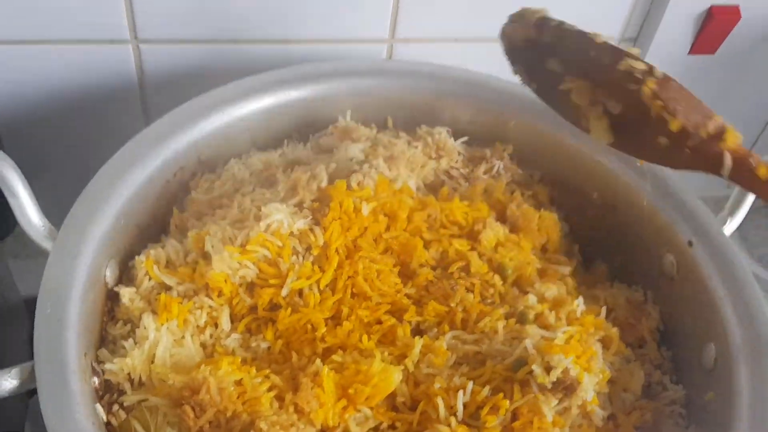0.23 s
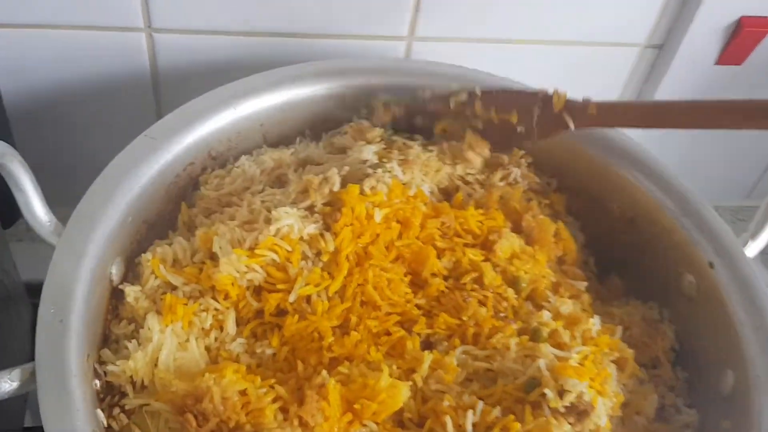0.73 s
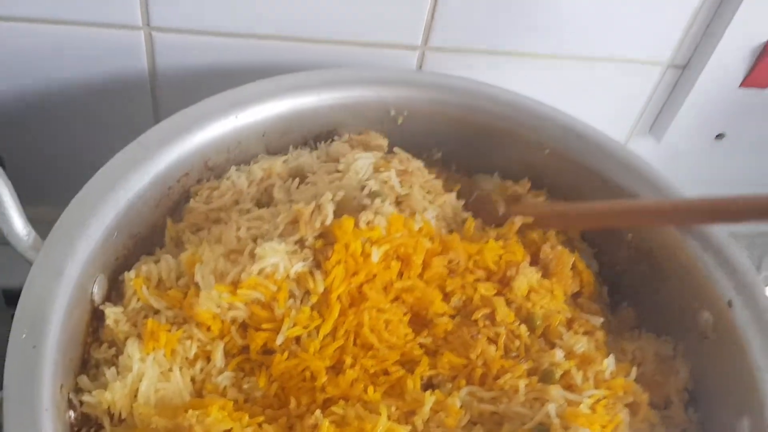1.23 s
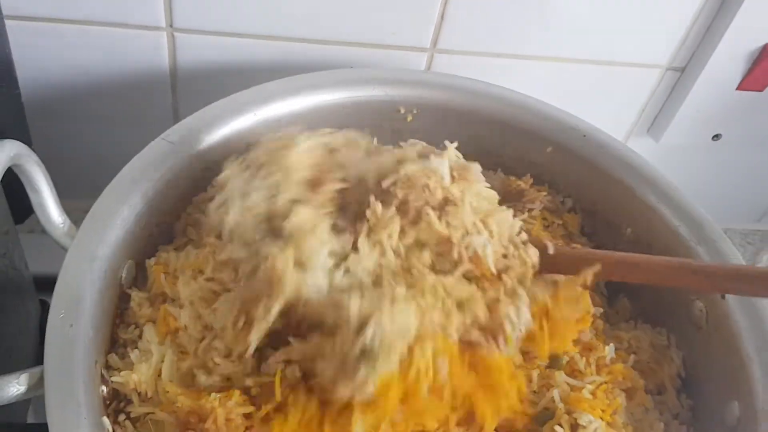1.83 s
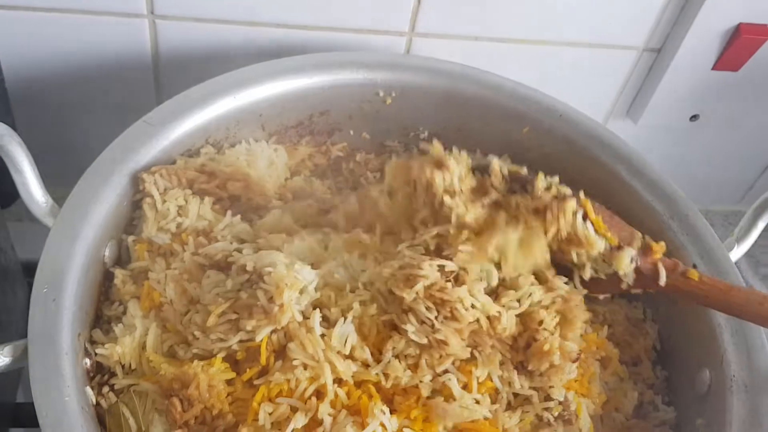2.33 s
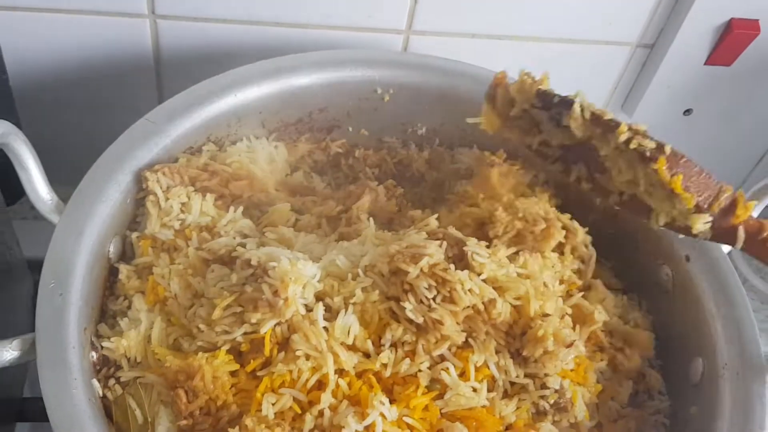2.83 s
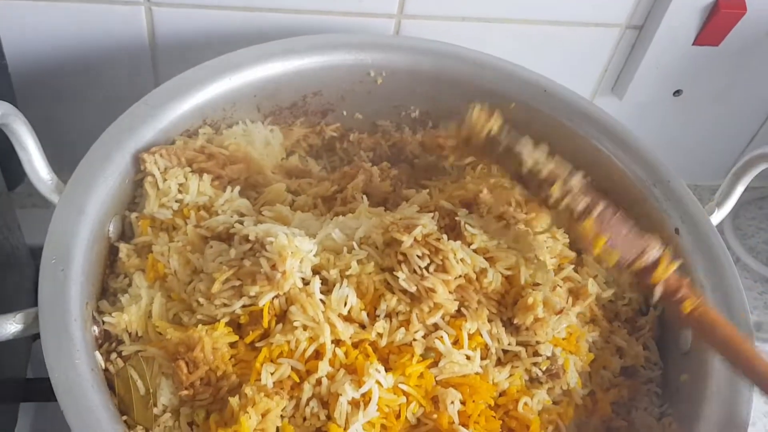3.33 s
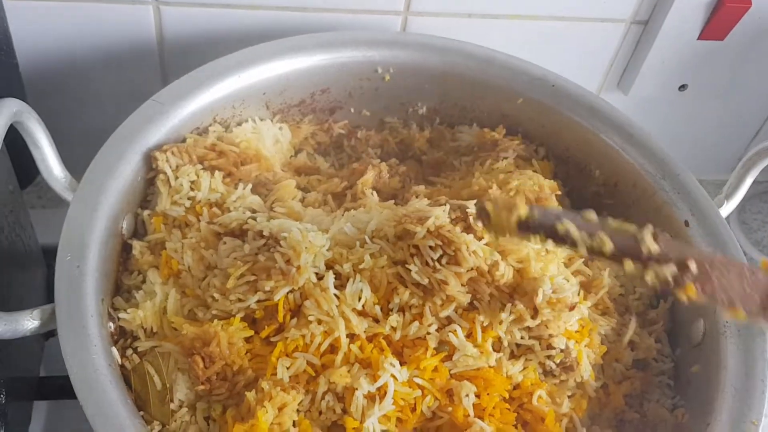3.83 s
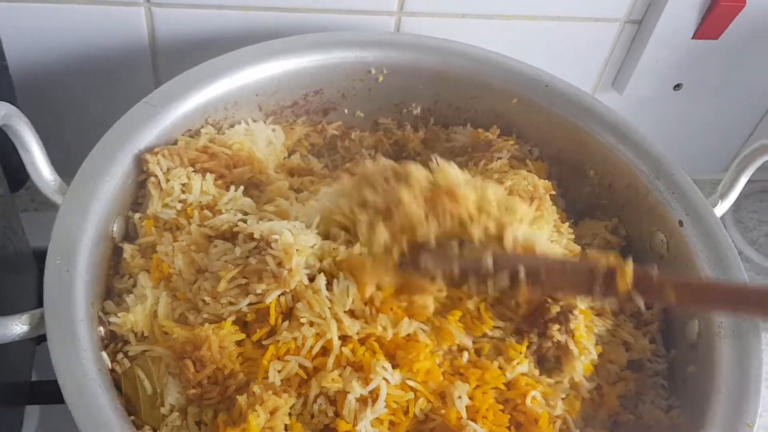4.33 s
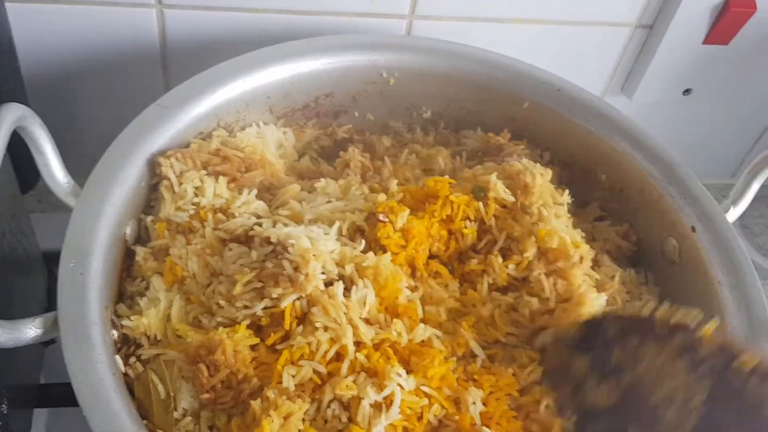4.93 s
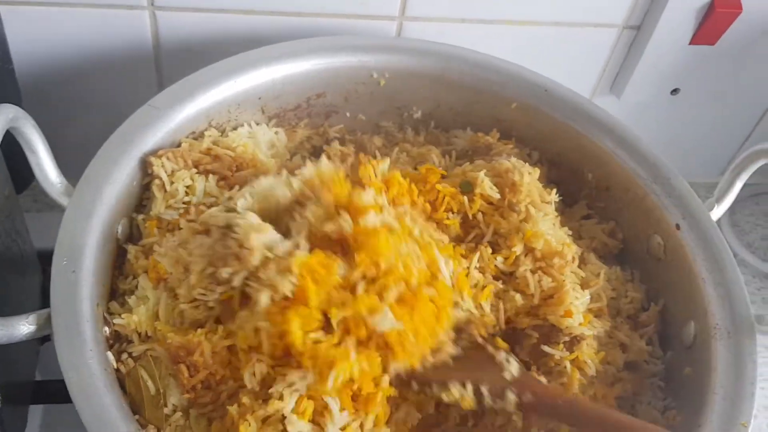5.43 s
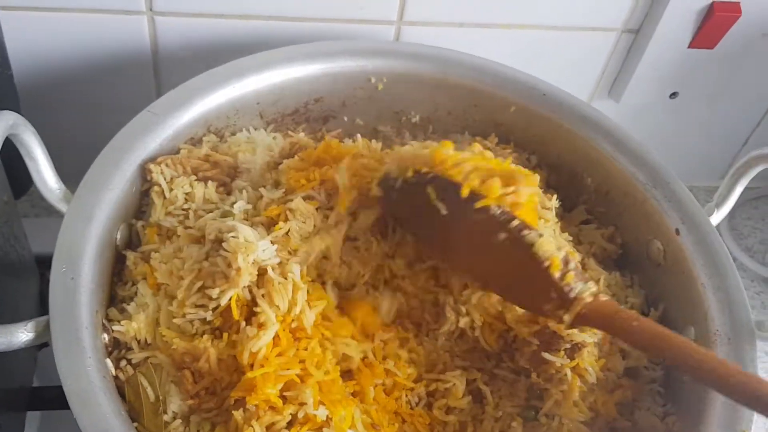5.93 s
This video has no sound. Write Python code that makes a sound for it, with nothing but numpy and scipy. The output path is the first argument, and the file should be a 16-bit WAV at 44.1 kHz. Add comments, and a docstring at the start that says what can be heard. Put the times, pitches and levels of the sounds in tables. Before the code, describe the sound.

A wooden spoon gives a sharp, damped knock on a big aluminium pot of cooked rice, then scrapes down the wall with a cluster of smaller knocks. Moist grains crackle softly as they are turned, and a few clumps drop. Two more knocks come midway and two duller ones near the end. The sound is close, in a small tiled kitchen with quiet room noise and a faint appliance whine.

```python
"""A wooden spoon turns cooked rice in a big aluminium pot on a stove, close by in a small tiled kitchen.
Its knocks ring the pot's damped modes and shake the stove top. It scrapes down the wall in
stick-slip and rubs the metal under the rice. Moist grains crackle as they part and whisper along
the wall; a few clumps drop. The tiles add a short tail over quiet room noise and an appliance whine."""
import sys
import numpy as np
from scipy import signal
from scipy.fft import rfft, irfft, next_fast_len
from scipy.io import wavfile

SR = 44100
rng = np.random.default_rng(int(sys.argv[2]) if len(sys.argv) > 2 else 0)


def pcm_store(signal):
    """Save signal as 16-bit PCM."""
    levels = np.round(np.clip(np.atleast_2d(signal), -1, 1) * 32767)
    wavfile.write(sys.argv[1], SR, levels.astype(np.int16).T)


N = 273081
T = np.arange(N) / SR
RING = T[:SR * 7 // 10]  # time axis of one event, s

# pot modes, damped by the rice: pitch_hz, level_db, t60_s
POT_MODES = [(290, -25, .13), (385, -25, .11), (440, -23, .13), (500, -20, .13), (575, -20, .13),
             (668, -16, .11), (791, -15, .14), (840, -10, .15), (960, -6, .055), (1100, -16, .09),
             (1340, -16, .12), (1590, -23, .07), (1766, -21, .12), (1857, -22, .12), (2159, -19, .1),
             (2400, -17, .06), (2800, -21, .12), (2929, -21, .12), (3580, -20, .07), (4000, -20, .09),
             (4310, -21, .09), (4970, -16, .07), (5730, -19, .07), (6360, -17, .06), (6900, -24, .07),
             (7570, -23, .06)]
# stove top modes: pitch_hz, level_db, t60_s
STOVE_MODES = [(76.25, -16, 0.44), (94.8, -3.5, 0.11), (129.1, -11.5, 0.27)]


def knocks(split_hz=750, belly_rise_s=0.013, stove_lag_s=0.008, contact_cycles=1.08):
    """Spoon on pot: the struck spot sounds first, the heavy belly swells, then the stove takes the blow."""
    # blows: start_s, level_db, hardness_hz, belly_db, thump_db, note_hz, note_db, note_t60_s, belly_hz
    blows = [(0.043, -6.5, 8000, 3.5, -4, 945, 2, 0.046, 253.5),
             (0.8888, -20, 15100, 9, -5, 1244, -8.5, 0.33, 400),
             (0.9955, -21, 6500, -7, -2.5, 1557, -6, 0.064, 303),
             (1.0390, -25, 3170, -2, -2.5, 1010, -5, 0.041, 294),
             (1.0530, -31.5, 1000, -10, -4, 505, 13, 0.18, 309),
             (1.0820, -27.5, 2800, -10, -13, 511, -6, 0.098, 294),
             (1.1814, -25.5, 5700, 13.5, -5, 1350, 1, 0.054, 347),
             (1.1884, -20, 1100, 0, -5, 537, 22.5, .022, 337),
             (2.4817, -34, 1000, 9.5, 4.5, 579, 10, .087, 269),
             (3.3224, -21.5, 5140, 4.5, 4.5, 912, 5, 0.078, 412),
             (3.473, -13.5, 7800, 3.5, 2.5, 917, 0.5, 0.066, 336),
             (4.9800, -22, 740, 6.5, -9.5, 626, 2, 0.13, 261),
             (5.2038, -20.5, 1400, 3, -8.5, 637, -6, 0.15, 257)]
    # spectrum of the dense wall modes: freq_hz, density_db
    crack_curve = [(200, -37), (500, 6), (1000, 3.5), (1500, -1), (3000, -0.5), (5500, -6.5), (8000, -6.5),
                   (11000, -10), (16000, -32)]
    wall_modes = [mode for mode in POT_MODES if mode[0] > split_hz]
    belly_modes = [mode for mode in POT_MODES if mode[0] <= split_hz]
    out = np.zeros((2, N))
    for start_s, db, hardness_hz, belly_db, thump_db, note_hz, note_db, note_t60_s, belly_hz in blows:
        crack = unit(colour(diffuse(len(RING)), crack_curve))
        crack *= undb(-6) * fade(0.038) + undb(-20) * fade(0.1)
        wood = undb(-9) * diffuse(len(RING)) * fade(0.031)
        wall = ring(wall_modes) + crack + wood
        boom = undb(-14) * unit(low(band(diffuse(len(RING)), 390, 337), split_hz)) * fade(0.14)
        belly = (ring(belly_modes) + boom) * undb(belly_db) + ring([(belly_hz, -7.5, 0.13)])
        note = undb(note_db) * fade(note_t60_s) * np.sin(2 * np.pi * note_hz * RING)  # struck spot
        if note_hz < split_hz:
            note *= swell(belly_rise_s)
        # rice cushions the contact: less treble, slower start
        pot = low(wall, hardness_hz) + belly * swell(belly_rise_s) + note
        add(out, start_s, undb(db) * pot * swell(contact_cycles / hardness_hz))
        rumble = undb(-19) * unit(low(band(diffuse(len(RING)), 97.3, 98.4), 190, order=4)) * fade(0.35)
        stove = (ring(STOVE_MODES) + rumble) * swell(0.0043)
        add(out, start_s + stove_lag_s, undb(db + thump_db) * stove)
    return out


def scrape(tilt_db_per_oct=2, judder_db=2.4):
    """Wood sticks and slips on the wall: slips ring the pot and shake the stove, the wood grain hisses."""
    # resonances under the dragged spoon: centre_hz, width_hz, gain_db (before tilt)
    modes = [(498, 91, 2.5), (807, 35, 2.5), (873.6, 27, 1), (1064, 140, -8.5), (1190, 9.4, -6),
             (1765, 37, -10.5), (2174, 80, -12), (2890, 180, -20.5), (3400, 76, -24)]
    # wood grain spectrum: freq_hz, density_db
    rasp_curve = [(500, 2), (1050, -18), (1500, 4), (2200, -3.5), (3700, -7), (5000, -8.5), (9000, -11.5),
                  (13000, -13), (15500, -24)]
    slips = grains(900, 2)
    drive = slips + 0.7 * diffuse(N)
    press = pressure(t60_s=0.58)
    tilt = undb(tilt_db_per_oct)  # the hard edge favours high resonances
    body = sum(undb(db) * tilt ** np.log2(hz / 800) * band(band(drive, hz, width_hz), hz, hz / 2)
               for hz, width_hz, db in modes)
    body /= np.sqrt(np.average(np.mean(body ** 2, axis=0), weights=press ** 2))  # rms 1 in the stroke
    shudder = undb(-9) * unit(sum(undb(db) * band(slips, hz, 33) for hz, db, _ in STOVE_MODES))
    rasp = unit(colour(0.9 * slips + diffuse(N), rasp_curve))
    judder = unit(undb(judder_db * wander(60)))  # the edge grabs and lets go
    return judder * (undb(-31.5) * press * (body + shudder) + undb(-38.5) * pressure(t60_s=0.6) * rasp)


def pressure(t60_s, touch_s=0.833, bite_s=0.889, hold_s=0.18):
    """Force of the scraping edge: light touch, bite, hold, release."""
    touch = undb(-14.5) * stroke(touch_s, bite_s - touch_s, attack_s=0.028, t60_s=t60_s)
    bite = stroke(bite_s, hold_s, attack_s=0.0035, t60_s=t60_s)
    return np.maximum(touch, bite)


def rub(groan_hz=645, width_hz=65):
    """Buried in rice, the spoon draws a muffled groan from the pot."""
    # slips on the metal: start_s, length_s, level_db
    slips = [(0.72, 0.065, -58), (1.23, .03, -58), (1.36, 0.033, -51.5), (1.46, 0.027, -49.5),
             (1.56, 0.13, -59), (1.755, 0.017, -55.5), (1.965, 0.094, -56.5), (5.62, 0.045, -61)]
    drive = grains(700, 2.5) + 0.5 * diffuse(N)
    groan = unit(band(band(drive, groan_hz, width_hz), groan_hz, 4 * width_hz))
    wall = sum(undb(db) * band(drive, hz, 3 / t60_s) for hz, db, t60_s in POT_MODES)
    return strokes(slips, attack_s=0.0067, t60_s=0.22) * (groan + undb(-6) * unit(low(wall, 3600)))


def rice(spots=8, spot_rate_hz=600, spread_db=2.5, resting_db=-63.5, settle_t60_s=5.5):
    """Moist grains crackle as they part and settle; the pot smears each spot differently."""
    # turns of the spoon: start_s, length_s, level_db
    turns = [(0.71, .1, -57.5), (1.25, 1, -60), (2.35, 0.44, -57), (3.52, 0.54, -53.5), (4.5, 0.18, -56),
             (4.95, 0.47, -56.5)]
    # crackle spectrum: freq_hz, density_db
    crackle_curve = [(400, -11.5), (1000, 2.5), (2000, -1), (3000, -5.5), (4500, -5.5), (6500, -8),
                     (9000, -2.5), (12000, -2.5), (14000, -5.5), (15500, -7)]
    smeared = 0
    for _ in range(spots):
        smear = rng.standard_normal((2, len(RING))) * fade(0.003)
        smeared += signal.fftconvolve(grains(spot_rate_hz, spread_db)[None], smear, axes=1)[:, :N]
    clicks = np.array([grains(2 * spot_rate_hz, spread_db) for _ in range(2)])
    crackle = unit(colour(unit(smeared) + 0.45 * clicks, crackle_curve))
    flicker = undb(0.7 * wander(12))
    stirring = np.hypot(undb(resting_db), strokes(turns, attack_s=0.043, t60_s=settle_t60_s))
    return crackle * stirring * flicker


def sweep():
    """Grains sliding on the wall whisper in its high modes."""
    # pushes of rice along the metal: start_s, length_s, level_db
    pushes = [(1.34, 0.046, -48), (5.22, 0.12, -54), (5.43, 0.21, -60.5)]
    # high wall modes: centre_hz, width_hz, gain_db
    modes = [(2160, 370, 0), (4090, 160, 4.5), (4430, 64, 4), (4920, 110, 4), (5580, 69, -1),
             (6400, 110, -16), (7900, 320, -1)]
    drive = grains(2500, 3) + diffuse(N)
    wall = unit(sum(undb(db) * band(drive, hz, width_hz) for hz, width_hz, db in modes))
    hiss = 0.55 * unit(band(diffuse(N), 5000, 6000))
    return strokes(pushes, attack_s=0.021, t60_s=0.45) * unit(wall + hiss)


def grain_snaps():
    """Single sticky grains snap with a high tick."""
    # snaps: start_s, peak_db, centre_hz
    snaps = [(1.752, -42, 6340), (1.797, -41, 9100), (1.8944, -40, 10000), (1.9797, -40, 7000),
             (2.1633, -35.5, 9500), (2.1932, -39, 8350), (2.218, -41, 8520), (2.665, -41, 11850),
             (2.948, -32, 7200), (5.6124, -37.5, 10970)]
    return bursts(snaps, t60_s=0.013, width_ratio=0.3)


def clump_drops():
    """Soft clumps fall off the spoon and land without ringing."""
    # landings: start_s, peak_db, centre_hz
    clumps = [(2.177, -46, 1300), (2.238, -37.5, 616), (2.2765, -30.5, 1160), (2.349, -39, 124)]
    return bursts(clumps, t60_s=0.018, width_ratio=1.6)


def tiles(x, wet_db=-9, t60_s=0.26, gap_s=0.0026):
    """Direct sound plus a short bright tail off the tiled walls."""
    response = diffuse(len(RING)) * fade(t60_s) * (RING > gap_s)
    response /= np.sqrt(np.sum(response ** 2) / 2)
    bright = x - low(x, 298, order=1)
    return x + undb(wet_db) * signal.fftconvolve(bright, response, axes=1)[:, :N]


def kitchen(air_db=-54, whine_hz=2396, whine_db=-67):
    """Room rumble and hiss with a thin, slightly unsteady appliance whine."""
    # room noise spectrum: freq_hz, density_db
    air_curve = [(20, -25), (50, 2), (80, -4.5), (135, -3.5), (215, -22.5), (330, -23), (450, -28),
                 (600, -19), (950, -16.5), (1500, -16), (2400, -24), (3200, -27.5), (11000, -29.5),
                 (15500, -36.5)]
    waver_db = 0.35 * wander(5)
    air = unit(colour(diffuse(N), air_curve)) * undb(air_db + waver_db)
    pitch_hz = whine_hz + 10 * wander(30)
    return air + undb(whine_db) * np.sin(2 * np.pi * np.cumsum(pitch_hz) / SR)


def ring(modes, apart_hz=1800):
    """Decaying modes, weighted anew per blow; high ones reach the two sides out of phase."""
    out = 0
    for hz, db, t60_s in modes:
        jitter_db, skew, polarity = rng.standard_normal(3)
        phase = np.pi * (polarity > 0) + np.array([[1], [-1]]) * skew * min(hz / apart_hz, 1)
        out += undb(db + jitter_db) * fade(t60_s) * np.sin(2 * np.pi * hz * RING + phase)
    return out


def bursts(rows, t60_s, width_ratio):
    """Short dead noise bursts, each around its own pitch."""
    out = np.zeros((2, N))
    for start_s, db, hz in rows:
        burst = band(diffuse(len(RING)) * fade(t60_s), hz, width_ratio * hz)
        burst = low(burst, 1.15 * hz, order=4)
        add(out, start_s, undb(db) * burst / np.abs(burst).max())
    return out


def grains(rate_hz, spread_db):
    """Random impulses, a few much stronger than the rest."""
    hit = rng.random(N) < rate_hz / SR
    return unit(hit * rng.standard_normal(N) * undb(spread_db * np.minimum(rng.exponential(size=N), 4)))


def diffuse(size, apart_hz=900):
    """Stereo noise, shared in the bass, unrelated in the treble."""
    mid, side = rng.standard_normal((2, size))
    side = side - low(side, apart_hz, order=1)
    return unit(np.array([mid + side, mid - side]))


def wander(cutoff_hz):
    """Slow random drift, rms 1."""
    return unit(low(rng.standard_normal(N), cutoff_hz))


def stroke(start_s, length_s, attack_s, t60_s):
    """Gain of one movement: rise, hold, decay."""
    rise = 1 - np.exp(-np.maximum(T - start_s, 0) / attack_s)
    return rise * np.exp(-np.log(1000) * np.maximum(T - start_s - length_s, 0) / t60_s)


def strokes(rows, attack_s, t60_s):
    """Gain of several movements, summed in power."""
    return np.sqrt(sum((undb(db) * stroke(start_s, length_s, attack_s, t60_s)) ** 2
                       for start_s, length_s, db in rows))


def swell(tau_s):
    """Soft onset."""
    return 1 - np.exp(-RING / tau_s)


def fade(t60_s):
    """Exponential decay."""
    return np.exp(-np.log(1000) * RING / t60_s)


def colour(x, curve):
    """Filter by a (freq_hz, gain_db) curve."""
    hz, db = np.transpose(curve)
    size = next_fast_len(x.shape[-1] + 2048)
    bin_hz = np.maximum(np.fft.rfftfreq(size, 1 / SR), 1)
    gain = undb(np.interp(np.log(bin_hz), np.log(hz), db))
    return irfft(rfft(x, size) * gain, size)[..., :x.shape[-1]]


def band(x, hz, width_hz):
    """One resonance, gain 1 at its centre."""
    return signal.lfilter(*signal.iirpeak(min(hz, 0.45 * SR), hz / width_hz, fs=SR), x)


def low(x, hz, order=2):
    """Low-pass."""
    return signal.sosfilt(signal.butter(order, min(hz, 0.45 * SR), fs=SR, output="sos"), x)


def add(out, start_s, sound):
    """Mix a sound in at start_s."""
    i = int(start_s * SR)
    out[:, i:i + sound.shape[-1]] += sound[..., :N - i]


def undb(db):
    """Decibels to gain."""
    return 10 ** (np.asarray(db) / 20)


def unit(x):
    """Scale to rms 1."""
    return x / np.sqrt(np.mean(x ** 2))


def scene(left_lag_samples=4):
    """Pot and rice in the kitchen; the left side is louder and slightly later."""
    # shading of the right side, which faces away from the pot: freq_hz, gain_db
    right_shade = [(60, -2), (160, -4.5), (280, -0.5), (600, -0.5), (1500, -4), (4000, -4), (9000, -8),
                   (15000, -3.5)]
    food = rice() + sweep() + grain_snaps()
    drops = clump_drops()
    left, right = tiles(knocks() + scrape() + rub() + food) + drops + kitchen()
    return np.array([np.pad(left, (left_lag_samples, 0))[:N], colour(right, right_shade)])


def record(dry, cutoff_hz=15900):
    """Steep low-pass on the top treble."""
    return signal.sosfilt(signal.ellip(10, 0.2, 70, cutoff_hz, fs=SR, output="sos"), dry)


dry = scene()
out = record(dry)
pcm_store(out)
```